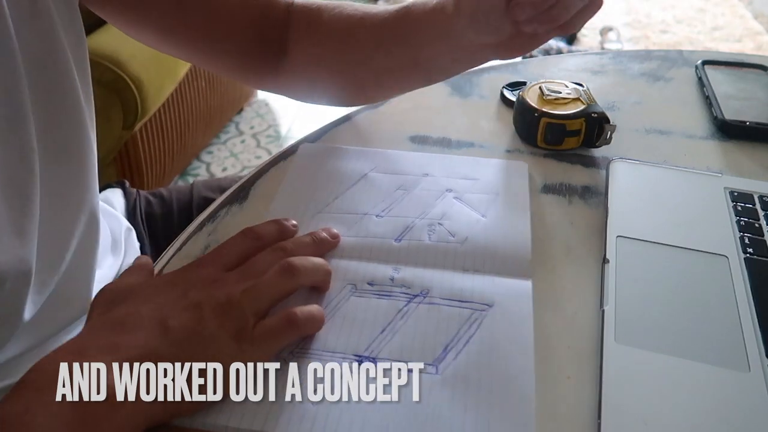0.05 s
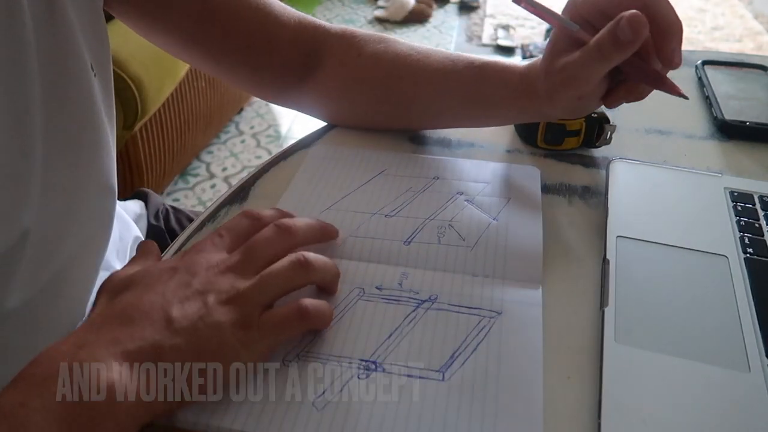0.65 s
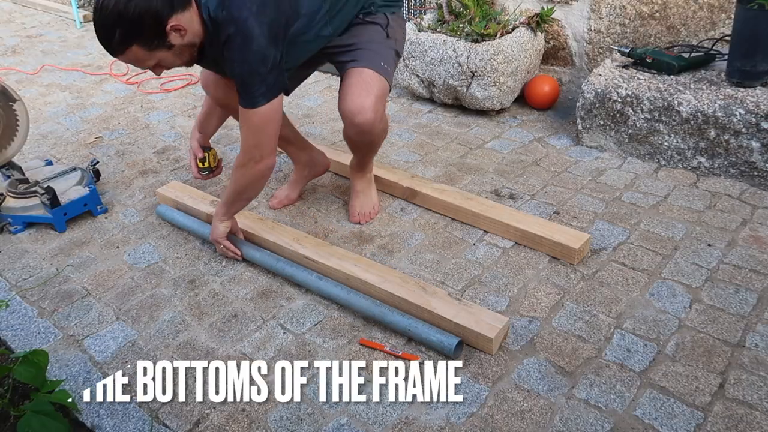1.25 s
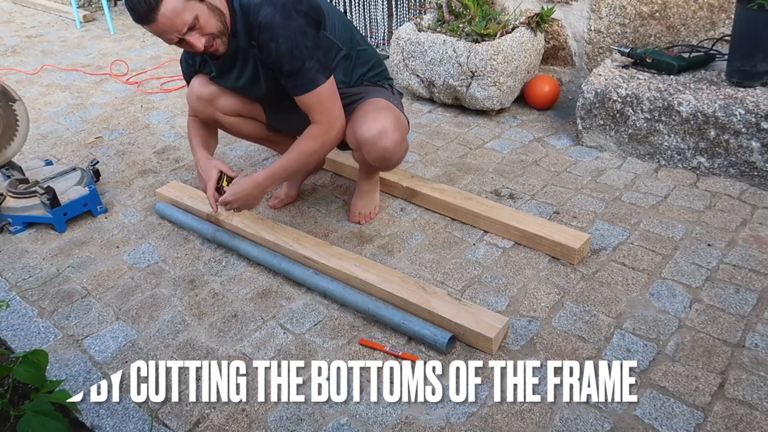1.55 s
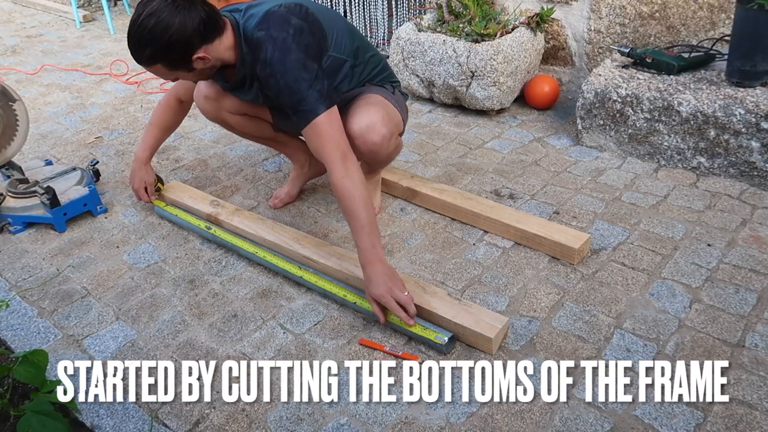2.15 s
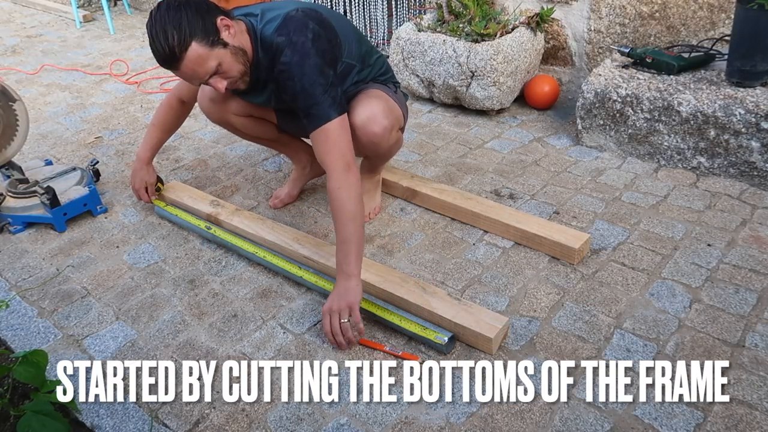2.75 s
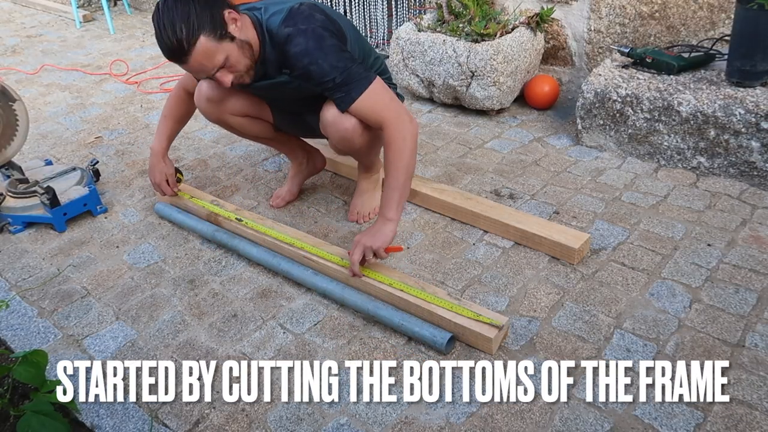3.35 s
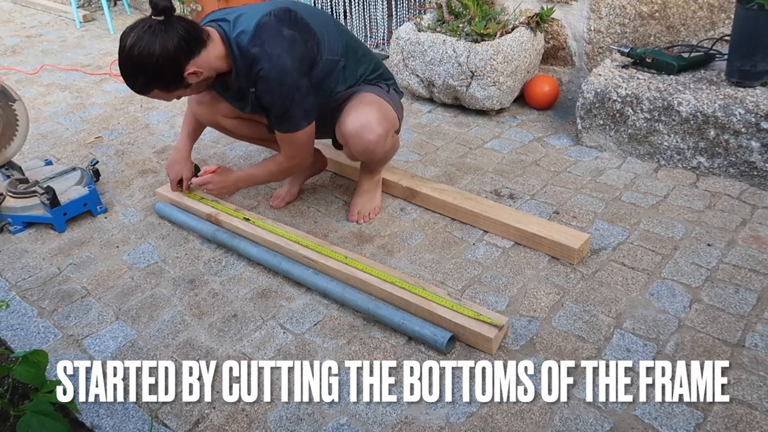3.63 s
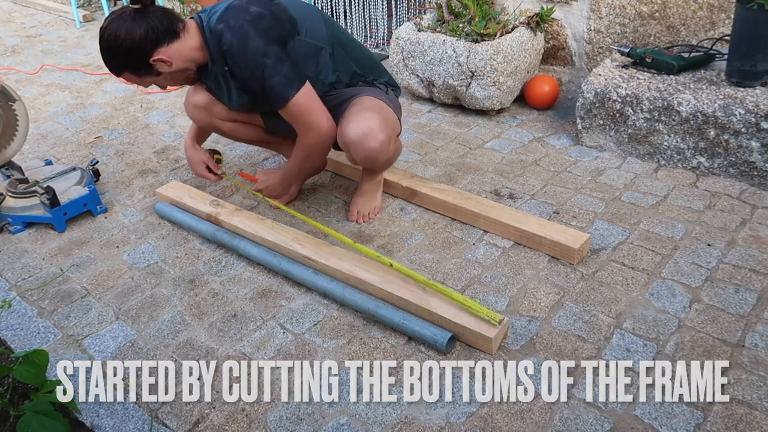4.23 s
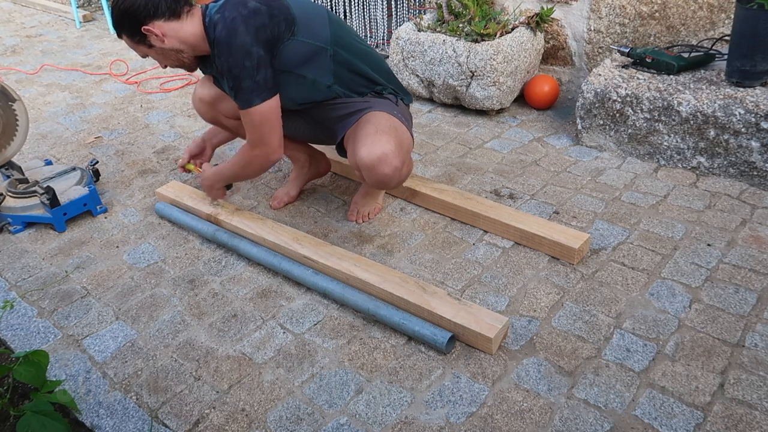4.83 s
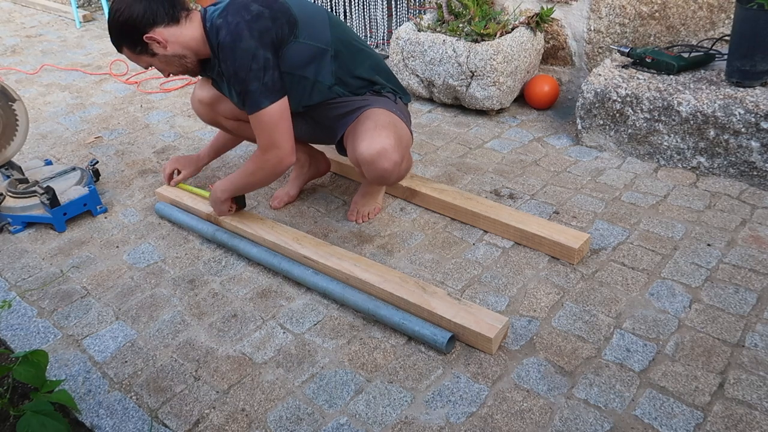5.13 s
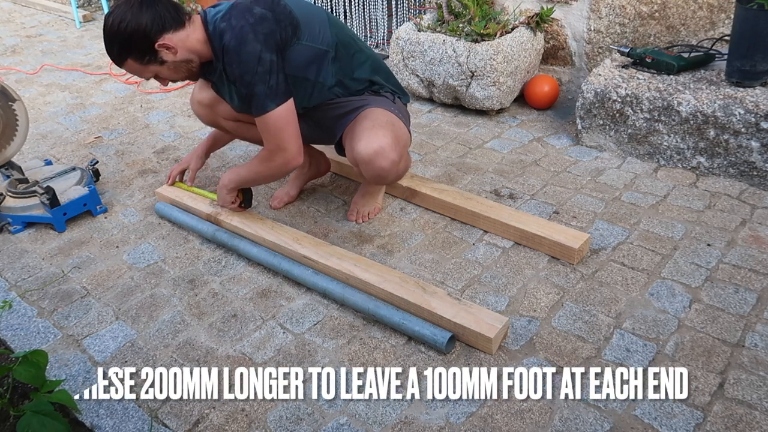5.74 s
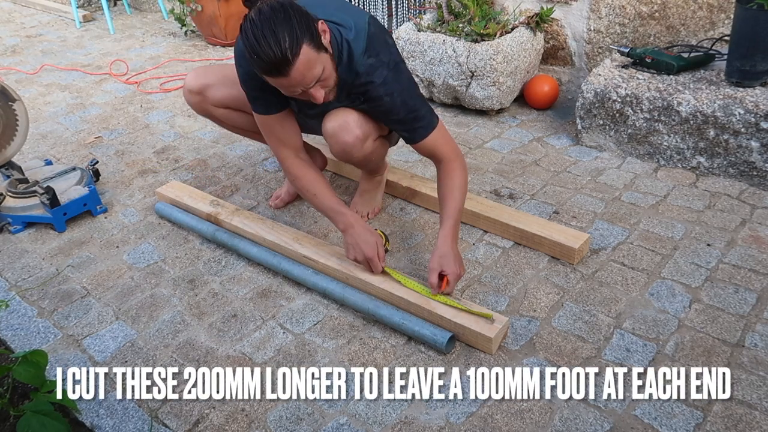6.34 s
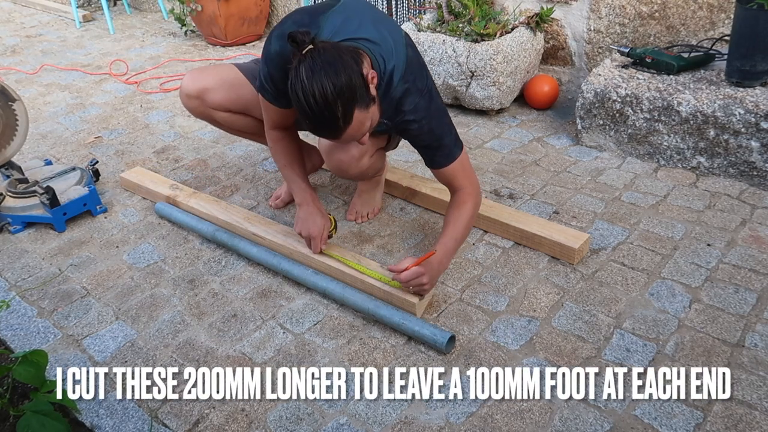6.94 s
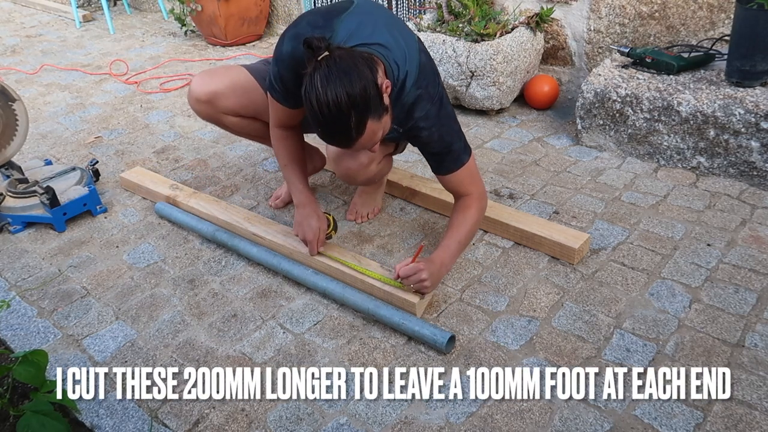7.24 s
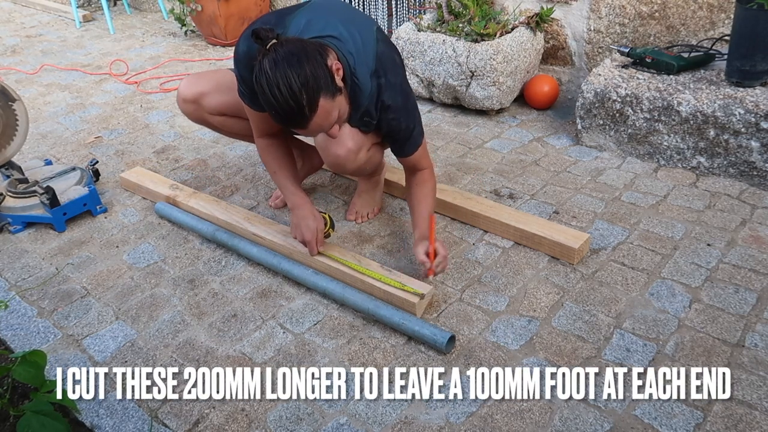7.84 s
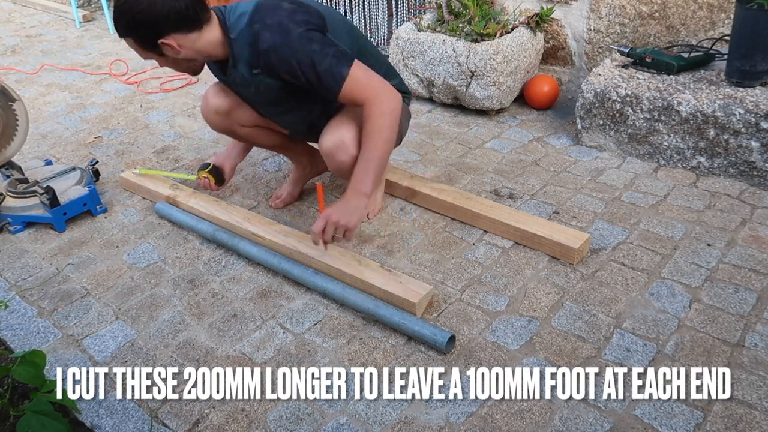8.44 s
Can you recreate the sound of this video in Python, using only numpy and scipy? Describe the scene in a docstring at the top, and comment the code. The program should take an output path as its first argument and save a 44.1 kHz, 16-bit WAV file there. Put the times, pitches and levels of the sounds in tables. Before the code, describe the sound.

Indoors, a hand brushes paper and softly bumps a desk. The background switches to a faint outdoor murmur and distant hum, and a steel pipe is set down beside timber with a loud, ringing clink and quick chatter. A steel tape measure slides out, rattles back and clicks in scattered clusters. Toward the end, timber scrapes on stone, a pencil makes two short marks and bare feet shift. The sound is close and fairly dry.

```python
"""Indoors, a hand brushes a sketchbook (friction noise) and bumps a desk. Then, over a paved yard's murmur
and a far hum, a steel pipe is set down beside a timber: its bending modes clink and chatter until the hand
damps them, and the camera's gain ducks. A steel tape measure is drawn out, tapped along the timber and let
run back, its blade hissing and its case clicking. Last, the timber scrapes on the stones, a pencil marks
it and bare feet shift."""
import sys
import numpy as np
from scipy import signal
from scipy.fft import rfft, irfft, next_fast_len
from scipy.io import wavfile
from scipy.ndimage import uniform_filter1d, minimum_filter1d, map_coordinates

SR = 44100
rng = np.random.default_rng(int(sys.argv[2]) if len(sys.argv) > 2 else 0)


def log_audio(samples):
    """Write samples as a 16-bit WAV file to the path given in sys.argv[1]."""
    # one column per channel
    frames = np.atleast_2d(samples).T
    # limit to full scale, then quantise
    limited = np.clip(frames, -1, 1)
    pcm = np.round(limited * 32767).astype(np.int16)
    wavfile.write(sys.argv[1], SR, pcm)


N = 373968
WIDENS_HZ = 9000  # above this, contact sounds spread between the ears


def amp(db):
    """Amplitude ratio of a level in decibels."""
    return 10 ** (np.asarray(db) / 20)


def unit(x):
    """Normalisation to rms 1."""
    return x / np.sqrt(np.mean(x ** 2) + 1e-20)


def along(points, hz):
    """Interpolation of (f/Hz, value) points on a logarithmic frequency axis."""
    f, values = np.transpose(points)
    return np.interp(np.log(hz + 1), np.log(f), values)


def wobble(rate, size=N):
    """Random modulation: a spline through `rate` Gaussian knots a second."""
    knots = rng.standard_normal(int(size * rate / SR) + 4)
    return map_coordinates(knots, [np.arange(size) * rate / SR])


def filtered(x, response):
    """Linear filtering: the spectrum is multiplied by a frequency response."""
    n = x.shape[-1]
    padded = next_fast_len(n + 4096)
    return irfft(rfft(x, padded) * response(np.fft.rfftfreq(padded, 1 / SR)), padded)[..., :n]


def shaped(spectrum):
    """Spectral envelope through (f/Hz, level/dB) points."""
    return lambda hz: amp(along(spectrum, hz))


def resonant(peaks):
    """Modal superposition of (f/Hz, bandwidth/Hz, level/dB) resonances, alternating in sign."""
    return lambda f: sum((-1) ** k * amp(db) * 1j * f * width / (f0 * f0 - f * f + 1j * f * width)
                         for k, (f0, width, db) in enumerate(peaks))


def ribbed(response, depth_db, spacing_hz=110):
    """Modal overlap: crowded modes put random peaks and dips in a response."""
    knots = rng.standard_normal(512)
    ripple = lambda hz: map_coordinates(knots, [hz / spacing_hz], order=1, mode="mirror")
    return lambda hz: response(hz) * amp(depth_db * ripple(hz))


def hiss(response, width=0.042, size=N, grit=0):
    """Filtered stereo noise of rms 1; grit breaks it into grains of log-normal size."""
    grains = np.repeat(np.exp(grit * rng.standard_normal(size // 16 + 1)), 16)[:size]
    spread = lambda hz: np.array([np.ones_like(hz), width * (1 + (hz / WIDENS_HZ) ** 2)])
    mid, side = filtered(rng.standard_normal((2, size)) * grains, lambda hz: response(hz) * spread(hz))
    return unit(np.array([mid + side, mid - side]))


def burst(response, t60):
    """Free decay after an impact: coloured noise falls 60 dB in t60 seconds."""
    t = np.arange(SR // 4) / SR
    return hiss(response, size=len(t)) * amp(-60 * t / t60)


def add(track, s, sound):
    """Superposition of a sound on a track, starting at s seconds."""
    part = track[:, round(s * SR):][:, :sound.shape[-1]]
    part += sound[..., :part.shape[-1]]


def strokes(rows, shape=1.84):
    """Incoherent addition of stroke envelopes, each 20 dB down at the ends of its rise and fall."""
    power = np.zeros(N)
    for s, db, rise, fall in rows:
        n = np.arange(max(int((s - 2 * rise) * SR), 0), min(int((s + 2 * fall) * SR), N))
        away = np.maximum((s - n / SR) / rise, (n / SR - s) / fall)
        power[n] += amp(db - 20 * away ** shape) ** 2
    return np.sqrt(power)


def bounces(s, db, gap_s, shrink=1, loss_db=0, count=4):
    """Restitution: (t/s, level/dB) of contacts whose gaps and amplitudes form geometric series."""
    k = np.arange(count)
    gaps = gap_s * shrink ** k
    return list(zip(s + np.cumsum(gaps) - gaps, db - loss_db * k))


# Coherence of the background between the ears: f/Hz, coherence/1
COHERENCE = [(60, 1), (250, 1), (1000, 0.65), (12000, 0.17)]
def air(spectrum):
    """Diffuse field: noise of rms 1 whose coherence between the ears falls with frequency."""
    angle = lambda hz: np.arccos(np.clip(along(COHERENCE, hz), -1, 1)) / 2
    response = lambda hz: shaped(spectrum)(hz) * [np.cos(angle(hz)), np.sin(angle(hz))]
    mid, side = filtered(rng.standard_normal((2, N)), response)
    return unit(np.array([mid + side, mid - side]))


# Noise spectra of the room and of the yard: f/Hz, relative level/dB
ROOM_SPECTRUM = [(15, -39), (25, -4), (318, -7), (2180, -16), (6040, -24.5), (15000, -43)]
YARD_SPECTRUM = [(18, -56), (30, -36.5), (106, -6), (287, -4.5), (437, -11), (632, -13.5), (2290, -18),
                 (3400, -23), (4300, -22.5), (16000, -32)]
# Tone of a distant motor: f/Hz, level/dB
MOTOR_HUM = [(480, -61.5)]
def background(outdoors_s=.97, restless_db=2.4, room_db=-50, yard_db=-50, shrill_db=-59):
    """Ambient noise: room tone, then the yard's modulated murmur, a hum and a thin shrill that fades."""
    t = np.arange(N) / SR
    yard = air(YARD_SPECTRUM)
    low = filtered(yard, lambda hz: 1 / (1 + (hz / 600) ** 4))
    murmur = amp(yard_db) * (yard - low + low * amp(restless_db * wobble(27)))
    hum = sum(amp(db) * np.sin(2 * np.pi * hz * t + wobble(9.7)) for hz, db in MOTOR_HUM)
    fading_db = np.interp(t, [5.8, 7.2], [0, -7])
    shrill = amp(shrill_db + fading_db + 2.1 * wobble(10))
    shrill = shrill * hiss(resonant([(2530, 89, -3), (3360, 171, -3)]), width=0.23)
    return np.where(t < outdoors_s, amp(room_db) * air(ROOM_SPECTRUM), murmur + hum + shrill)


def walls(x, t60=0.11):
    """Reverberation: convolution with the short, decaying reflections of the yard's stone."""
    t = np.arange(SR // 3) / SR
    tail = rng.standard_normal((2, len(t))) * amp(-60 * t / t60) * (t > .006)
    return signal.fftconvolve(x, tail / np.linalg.norm(tail[0]), axes=1)[:, :N]


# Bare feet on the paving: t/s, level/dB
FOOT_PATS = [(7.976, -39), (8.049, -38), (8.317, -46), (8.365, -45)]
# The body shifting its weight: t/s, level/dB, rise/s, fall/s
WEIGHT_SHIFTS = [(4.4, -49, 0.44, 0.31), (6.3, -52, 0.7, 0.77), (8.36, -48, 0.16, 0.15)]
def feet(rise_s=0.0069, fall_s=0.012):
    """Soft contact excites only low frequencies: skin pats on stone and shifting weight rustles."""
    pats = strokes([(s, db, rise_s, fall_s) for s, db in FOOT_PATS])
    dull = resonant([(110, 38, -1.7), (275, 113, -0.26)])
    return (pats + strokes(WEIGHT_SHIFTS)) * hiss(dull, width=0.11)


# Faint falling squeaks: t/s, level/dB, duration/s, first f/Hz, last f/Hz
SQUEAKS = [(2.375, -47.5, 0.082, 2400, 850), (6.999, -43.5, 0.065, 2190, 1395)]
def squeaks(waver=0.048, rub_db=-10, rub_lag_s=0.089, rub_s=0.14):
    """Frequency modulation: unsteady whistles glide down, each trailed by a thin high rub."""
    rubs = strokes([(s + rub_lag_s, db + rub_db, rub_s, rub_s) for s, db, *_ in SQUEAKS])
    out = rubs * hiss(ribbed(resonant([(9800, 3300, 0)]), depth_db=8))
    unsteady = 1 + waver * wobble(250)
    for s, db, length, first_hz, last_hz in SQUEAKS:
        n = int(length * SR)
        hz = np.geomspace(first_hz, last_hz, n) * unsteady[int(s * SR):][:n]
        envelope = amp(db) * np.sqrt(np.hanning(n)) * wobble(445, size=n)
        add(out, s, envelope * np.sin(2 * np.pi * np.cumsum(hz) / SR))
    return out


# Sleeve and hand on paper, and the arm settling on the desk: t/s, level/dB, rise/s, fall/s
SLEEVE_BRUSH = [(.08, -36, 0.049, 0.12), (.14, -39, 0.04, 0.057)]
HAND_RUB = [(.262, -45, 0.011, 0.068)]
ARM_LEAN = [(.795, -37, 0.083, 0.1)]
# Taps on the desk: t/s, relative level/dB
DESK_TAPS = [(.715, -29), (0.7798, -15.5)]
# Spectra of brushed paper and of the struck desk: f/Hz, relative level/dB
PAPER_SPECTRUM = [(180, -55), (300, -35), (726, -11), (2430, 3.5), (14000, -29.5)]
DESK_SPECTRUM = [(120, -38), (200, -9), (1880, -10.5), (2650, -3.5), (12500, -43), (15000, -51)]
def desk():
    """Friction and impact: skin brushes paper, then the arm comes down with a tap and a soft thump."""
    out = strokes(SLEEVE_BRUSH) * hiss(shaped(PAPER_SPECTRUM), width=0.18, grit=0.23)
    out += strokes(HAND_RUB) * hiss(lambda f: resonant([(800, 600, 0)])(f) ** 2)
    out += strokes(ARM_LEAN) * hiss(resonant([(42, 10, -6), (70, 20, 3)]), width=0.29)
    top = shaped(DESK_SPECTRUM)
    for s, db in DESK_TAPS:
        add(out, s, amp(db - 9.5) * (burst(top, t60=0.018) + amp(-19.5) * burst(top, t60=0.29)))
    return out


# Timber on stone, then two pencil marks: t/s, level/dB, rise/s, fall/s, body level re grinding/dB
SCRAPES = [(6.539, -32.5, 0.022, 0.08, -12), (6.584, -28, 0.038, 0.079, -3),
           (7.875, -29.5, 0.012, 0.012, -13), (8.218, -25.5, 0.012, 0.014, -22.5)]
# Spectrum of grinding grit: f/Hz, relative level/dB
GRIT_SPECTRUM = [(880, -49), (1500, -16), (2540, -7.5), (4500, -6.5), (5600, 6), (6630, -10), (9560, -9),
                 (16000, -27)]
# Modes of the timber: f/Hz, bandwidth/Hz, relative level/dB
TIMBER_MODES = [(425, 62, 0.5), (693, 155, -6), (1240, 100, -3), (2520, 110, -8)]
def timber():
    """Forced vibration: sand or pencil lead grinds on the wood and drives its modes."""
    grind = strokes([row[:4] for row in SCRAPES])
    grind = grind * hiss(ribbed(shaped(GRIT_SPECTRUM), depth_db=4.5), grit=0.42, width=0.04)
    push = strokes([(s, db + body_db, rise, fall) for s, db, rise, fall, body_db in SCRAPES])
    body = push * hiss(resonant(TIMBER_MODES), grit=0.34, width=0.1)
    return amp(0.63 * wobble(160)) * (grind + body)


def crinkles(per_s=600, range_hz=(6000, 15800), t60=.005, scatter_db=5):
    """Shot noise of rms 1: flexing steel gives tiny ticks of random time, pitch and size."""
    count = int(per_s * N / SR)
    when, pitch = rng.random((2, count, 1))
    n = np.arange(int(t60 * SR))
    sizes = amp(scatter_db * np.minimum(rng.standard_normal((count, 1)), 2))
    hz = np.interp(pitch, [0, 1], range_hz)
    ticks = sizes * amp(-60 * n / SR / t60) * np.sin(2 * np.pi * hz * n / SR)
    samples = (when * N).astype(int) + n
    return unit(np.bincount(samples.ravel(), ticks.ravel(), N)[:N])


# The blade passing through the case mouth: t/s, relative level/dB, duration/s
BLADE_SLIDES = [(1.691, -40, 0.13), (1.928, -46, 0.037), (2.032, -46.5, .12), (3.196, -46, .06),
                (4.29, -38, 0.1), (4.383, -40, 0.31), (4.533, -37.5, 0.18), (4.865, -51, 0.34),
                (5.964, -45.5, 0.25), (6.197, -55.5, 0.79), (6.249, -41, 0.072), (8.272, -31.5, 0.064)]
# Spectrum of the sliding blade: f/Hz, relative level/dB
SLIDE_SPECTRUM = [(350, -36), (600, -8), (3990, -5), (4520, -6), (12700, 6.5), (16000, -9)]
# Shivers of the lifted blade: t/s, level/dB, rise/s, fall/s
BLADE_SHIVERS = [(3.195, -46, 0.015, 0.035), (8.4, -43, 0.059, 0.12)]
# Resonances of the shiver: f/Hz, bandwidth/Hz, relative level/dB
SHIVER_MODES = [(2880, 840, -5), (7280, 290, 2.5), (10400, 700, -6.5), (14500, 800, -9)]
# Slaps of the blade: t/s, rattle level/dB, relative ring level/dB
BLADE_SLAPS = [(4.327, -27.5, -31), (4.368, -43, -30.5), (4.472, -25, -36), (4.528, -35, -52),
               (4.542, -28, -54), (4.565, -29.5, -52)]
# Modes of the slapped blade: f/Hz, relative level/dB, T60/s
BLADE_MODES = [(4960, -16.5, 0.6), (7400, -8, 0.22), (10530, 2, 0.15), (13500, 6, 0.14), (15600, 5, 0.15)]
def tape_blade(rise_share=0.56, rattle_t60=0.064, rub_db=-19):
    """Friction and impact excite a thin strip: it hisses, slaps as it runs home and shivers if lifted."""
    steel = ribbed(shaped(SLIDE_SPECTRUM), depth_db=-3.5)
    pulls = strokes([(s, db, rise_share * length, (1 - rise_share) * length)
                     for s, db, length in BLADE_SLIDES])
    slide = amp(2.84 * wobble(140) - 2.5) * (hiss(steel, grit=0.16) + crinkles())
    rub_on_wood = amp(rub_db) * hiss(resonant([(1580, 1000, 0)]))
    out = pulls * (slide + rub_on_wood)
    out += strokes(BLADE_SHIVERS) * hiss(resonant(SHIVER_MODES))
    for s, rattle_db, ring_db in BLADE_SLAPS:
        ring = sum(amp(db) * burst(lambda f: resonant([(hz, 170, 0)])(f) ** 2, t60)
                   for hz, db, t60 in BLADE_MODES)
        rattle = burst(steel, rattle_t60)
        knock_on_wood = amp(-15) * burst(resonant(TIMBER_MODES), rattle_t60)
        add(out, s, amp(rattle_db) * (rattle + knock_on_wood) + amp(ring_db) * ring)
    return out


def click(tone, t60):
    """Impulse response: a sharp edge, a ring that varies with the spot struck, and the timber's answer."""
    spot = ribbed(tone, depth_db=5)
    ring = burst(spot, t60)
    edge = amp(-4) * burst(tone, t60=0.0086)
    tail = amp(-24) * burst(spot, t60=0.18)
    wood = amp(-24) * burst(resonant(TIMBER_MODES), t60=0.027)
    return ring + edge + tail + wood


# The plastic case clicking in the hand: t/s, relative level/dB
CASE_CLICKS = [(2.109, -33), (2.9756, -37.5), (3.3875, -18), (3.48, -32), (3.5083, -23.5), (3.932, -26.5),
               (3.955, -37), (4.341, -16), (4.3542, -17), (5.001, -28.5), (6.168, -21), (6.1725, -16.5),
               (6.1885, -21), (6.198, -21), (6.2085, -26), (6.4408, -22.5), (6.533, -23), (6.5735, -19),
               (6.882, -29), (7.1536, -25.5), (7.287, -27.5), (7.452, -33)]
# Steel snapping against the case: t/s, relative level/dB, ring f/Hz
STEEL_SNAPS = [(3.3553, -29, 10400), (4.3696, -10.5, 10600), (4.544, -13, 13000), (4.6036, -13.5, 9500),
               (4.742, -19, 11400), (4.7538, -29, 9400), (4.974, -32, 11100), (5.9467, -17, 11200),
               (5.974, -21, 8900), (6.758, -25, 8500), (6.7976, -15, 7300), (6.8032, -14, 6150)]
# Spectra of a click and of a snap: f/Hz, relative level/dB
CASE_SPECTRUM = [(900, -20), (2400, -12.5), (3200, -9.5), (4700, 1), (6100, 3), (8000, -6), (10000, -2),
                 (16000, -9.5)]
SNAP_SPECTRUM = [(1500, -21), (5000, -15), (6200, -11), (9300, 0.5), (16000, -1)]
def tape_case(click_db=-7.5, snap_db=-6.5):
    """Impact transients: the case clicks, its lock slips in even ticks and steel snaps against it."""
    out = np.zeros((2, N))
    lock_ticks = bounces(s=4.007, db=-29, gap_s=.053, count=3)
    for s, db in list(CASE_CLICKS) + lock_ticks:
        add(out, s, amp(db + click_db) * click(shaped(CASE_SPECTRUM), t60=0.042))
    for s, db, hz in STEEL_SNAPS:
        peak = resonant([(hz, 1000, 0)])
        tone = lambda f: shaped(SNAP_SPECTRUM)(f) + amp(3.5) * np.abs(peak(f)) ** 2
        add(out, s, amp(db + snap_db) * click(tone, t60=0.015))
    return out


LANDING_S = .9947  # the pipe first lands dully on the timber
# The pipe striking stone: t/s, relative level/dB
PIPE_STRIKES = [(1.1039, -11), (1.1678, 9), (1.1985, -5), (1.2814, -15.5), (1.3805, -39)]
def pipe_contacts(first_tilt=-2.1, tilt_per_s=130, max_tilt=15):
    """Harder contacts are brighter and knock less: rows of t/s, ring/dB, tilt/(dB/octave), knock/dB."""
    contacts = [(LANDING_S, -45.5, -14, -12)]
    chatter = bounces(s=1.2173, db=4, gap_s=.0112, shrink=.83, loss_db=5.5)
    for s, db in list(PIPE_STRIKES) + chatter:
        tilt = min(first_tilt + tilt_per_s * (s - PIPE_STRIKES[0][0]), max_tilt)  # hardens as it settles
        knock_db = -4 + .6 * db - 0.46 * tilt
        contacts.append((s, db, tilt, knock_db))
    return contacts


# Modes of the free pipe: f/Hz, relative level/dB, T60/s
PIPE_MODES = [(872, -29, .4), (2348, -8, .085), (4512, 0, .42), (7200, -7, .11), (10315, -24, .085),
              (13810, -37, .16), (15620, -45, .15)]
# Damping by the closing hand: t/s, added decay rate/(dB/s)
HAND_DAMPING = [(1.232, 16), (1.25, 687), (1.266, 1410), (1.32, 513.5)]
def pipe_ring(contacts, waver=0.014, sharpen_hz=90, flutter_db=4, spread=0.1):
    """Modal damping: each contact feeds energy into the tube's modes and the gripping hand drains it."""
    t = np.arange(SR) / SR
    grip = np.interp(LANDING_S + t, *np.transpose(HAND_DAMPING))
    drained_db = np.cumsum(grip) / SR
    # pressed against its support, the tube rings a little sharp and buzzes
    held = np.maximum.accumulate(grip / grip.max())
    buzz = .1 + .9 * held
    ring = np.zeros((2, SR))
    for hz, mode_db, t60 in PIPE_MODES:
        lost_db = 60 * t / t60 + drained_db
        energy = np.zeros(SR)
        for s, db, tilt, _ in contacts:
            k = max(round((s - LANDING_S) * SR), 0)
            struck_db = db + mode_db + tilt * np.log2(hz / 4500)
            energy[k:] += amp(struck_db - lost_db[k:] + lost_db[k]) ** 2
        pitch_hz = hz * (1 + waver * buzz * wobble(180, size=SR)) + sharpen_hz * held ** 2
        energy *= amp(flutter_db * buzz * wobble(180, size=SR)) ** 2
        envelope = uniform_filter1d(np.sqrt(energy), size=24, mode="constant")
        pan = rng.choice([-1, 1]) * spread * (hz / WIDENS_HZ) ** 2
        ring += np.array([[1 + pan], [1 - pan]]) * envelope * np.sin(2 * np.pi * np.cumsum(pitch_hz) / SR)
    return ring


# Resonances of the pipe's knock on timber and stone: f/Hz, bandwidth/Hz, relative level/dB
KNOCK_MODES = [(410, 51, 1.5), (615, 120, -4.5), (1349, 230, -5), (2350, 75, 4.5), (2943, 1100, -14)]
def pipe(knock_t60=0.043, clatter_t60=0.12, crack_hz=3300, crack_t60=.013):
    """Impact excites both bodies: the tube rings, timber and stone thud, and steel rasps on grit."""
    t = np.arange(SR // 4) / SR
    contacts = pipe_contacts()
    out = np.zeros((2, N))
    add(out, LANDING_S, pipe_ring(contacts))
    for s, _, tilt, knock_db in contacts:
        is_hard = tilt > -6
        crack = is_hard * amp(3 - 60 * t / crack_t60) * np.sin(2 * np.pi * crack_hz * t)
        thud = amp(-4.5) * burst(resonant(KNOCK_MODES), knock_t60)
        clatter = amp(-20) * burst(resonant(KNOCK_MODES), clatter_t60)
        rasp = amp(tilt - 14) * burst(shaped(GRIT_SPECTRUM), knock_t60)
        add(out, s, amp(knock_db) * (crack + thud + clatter + rasp))
    return out


def scene():
    """Superposition of all sources, with weak reflections of the tape, timber and pipe."""
    woodwork = tape_case() + tape_blade() + timber()
    clink = pipe()
    direct = desk() + woodwork + clink
    reflections = amp(-35) * walls(woodwork) + amp(-27) * walls(clink)
    return direct + reflections + feet() + squeaks() + background()


def record(dry, ceiling_db=-8, hold_s=0.061, release_db_per_s=35, attack_s=0.001, top_hz=16000):
    """Automatic gain control: the gain ducks, holds and creeps back; clipping and a low-pass follow."""
    power = np.abs(uniform_filter1d(np.mean(dry ** 2, axis=0), size=48))
    over_db = np.maximum(10 * np.log10(power + 1e-12) - ceiling_db, 0)
    hold = int(hold_s * SR)
    held_db = -minimum_filter1d(-over_db, hold, origin=(hold - 1) // 2)
    creep_db = release_db_per_s * np.arange(N) / SR
    released_db = np.maximum.accumulate(held_db + creep_db) - creep_db
    pole = np.exp(-1 / (attack_s * SR))
    duck_db = signal.lfilter([1 - pole], [1, -pole], released_db)
    clipped = np.clip(dry * amp(-duck_db), -1, 1)
    return filtered(clipped, lambda hz: 1 / (1 + (hz / top_hz) ** 160))


dry = scene()
out = record(dry)
log_audio(out)
```